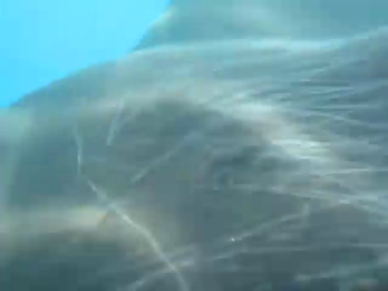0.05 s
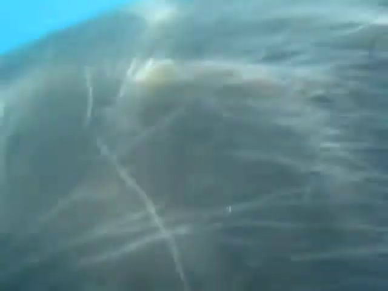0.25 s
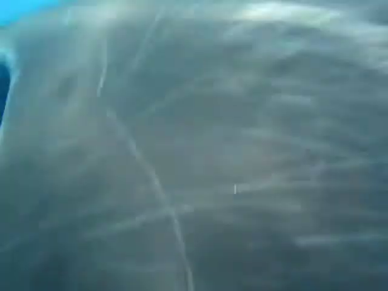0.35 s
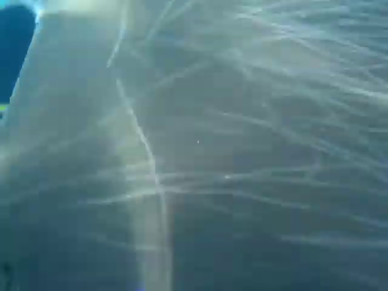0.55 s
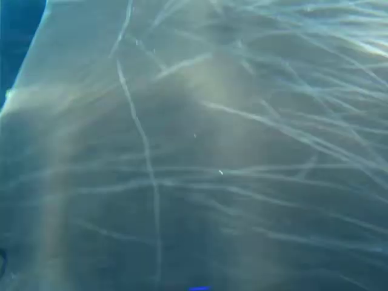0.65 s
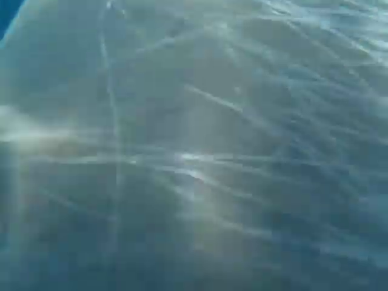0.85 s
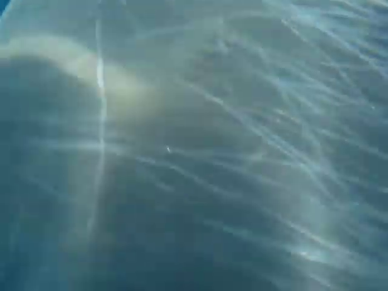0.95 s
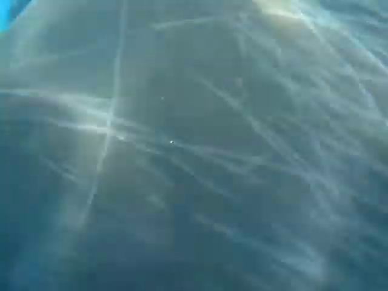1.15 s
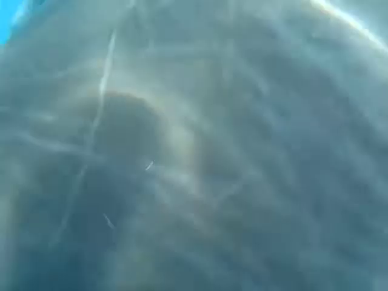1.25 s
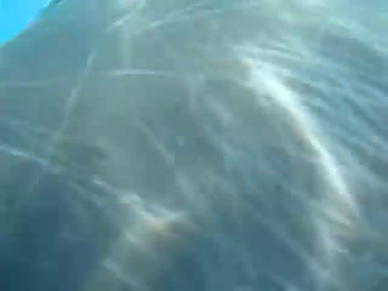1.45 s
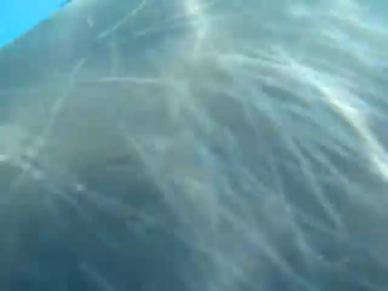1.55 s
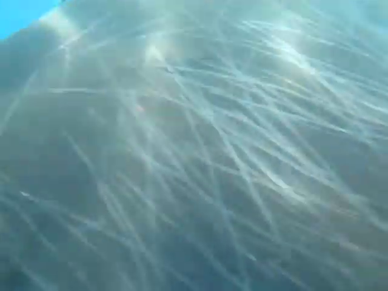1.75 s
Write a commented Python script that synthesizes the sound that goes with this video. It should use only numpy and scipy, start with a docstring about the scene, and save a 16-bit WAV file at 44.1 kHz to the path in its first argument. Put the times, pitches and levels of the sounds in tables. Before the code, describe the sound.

Crackling, snapping and rustling come straight through a plastic case as an animal's fur brushes it, right at the microphone. A short creak dies away and two soft bumps follow, above a quiet rumble and thin electronic whine.

```python
"""A hairy animal presses against a camera's plastic housing, right at the microphone inside.
The contact rubs, sticks and lets go in sharp snaps, with brief scrapes and three squeaks,
then creaks and dies away. One dull knock falls among the snaps and two more near the end.
All of it comes straight through the housing, with no sound of the space around it.
Underneath lie a quiet rumble, a wavering hum, hiss and the thin whine of the electronics."""
import sys
import numpy as np
from scipy import signal
from scipy.fft import rfft, irfft
from scipy.io import wavfile

SR = 44100
rng = np.random.default_rng(int(sys.argv[2]) if len(sys.argv) > 2 else 0)


def put_to_file(sound):
    """Save the sound as 16-bit audio at rate SR, in the file named by the first command-line argument."""
    columns = np.atleast_2d(sound).T  # one column per channel
    safe = np.clip(columns, -1, 1)
    whole_steps = np.round(safe * 32767)
    wavfile.write(sys.argv[1], SR, whole_steps.astype(np.int16))


N = 79380

# spectrum of the rumble and hiss at the microphone (frequency [Hz], relative density [dB])
FLOOR_SPECTRUM = [(25, 1), (70, -3), (170, -5.5), (320, -12.5), (650, -14), (1400, -17), (2100, -23.5),
                  (3000, -22.5), (5500, -18.5), (7300, -22), (9000, -17.5), (10800, -21), (12000, -36),
                  (14000, -26), (16000, -43)]
# the hum underneath (time [s], level [dB])
HUM_LEVELS = [(0, -73), (.12, -65), (.25, -98), (.8, -65.5), (.97, -67.5), (1.37, -65), (1.55, -70),
              (1.8, -105)]
# hair rubbing on the housing (time [s], level [dB])
RUB_LEVELS = [(0, -65.5), (.215, -69), (.25, -44.5), (.282, -59), (.31, -73), (.355, -59), (.38, -51.5),
              (.41, -95), (.46, -52), (.72, -53.5), (.775, -59), (.815, -43), (.84, -42.5), (.854, -40),
              (.862, -59), (.895, -44.5), (.93, -72), (.98, -60.5), (1.012, -48), (1.05, -73), (1.25, -69),
              (1.8, -69.5)]
# resonances of the wall where it is pressed (frequency [Hz], width [Hz], gain before tilt [dB])
WALL_MODES = [(342, 260, -17), (878, 370, -9), (1575, 198, -0.5), (2605, 460, -8), (3000, 160, -9),
              (3600, 380, -11), (4280, 120, -8), (5120, 620, -14), (5890, 320, -11.5), (6910, 320, -20),
              (8180, 820, -23), (9750, 740, -22), (13400, 2300, -43)]
# releases of the contact (time [s], hollow level [dB], shell level [dB], edge level [dB], shell pitch [Hz])
SNAP_EVENTS = [(0.012, -63.5, -51.5, -81, 3950), (0.0629, -55.5, -41, -48.5, 3000),
               (0.0867, -57.5, -45.5, -60, 4100), (0.157, -83, -61, -54, 3700),
               (0.2353, -44, -48, -53, 3530), (0.2425, -36, -48, -44.5, 4600),
               (0.2735, -45, -47, -38, 3200), (0.296, -55.5, -51, -42.5, 4540),
               (0.3635, -60, -48, -50, 3230), (0.3695, -51, -48, -48.5, 4600),
               (0.3885, -52, -50, -59, 4560), (0.4727, -43.5, -35.5, -36, 4860),
               (0.4999, -55, -40.5, -38.5, 5400), (0.514, -46, -35, -41, 3570),
               (0.5168, -41.5, -30, -38.5, 3700), (0.5229, -42, -37, -39, 4000),
               (0.5497, -41, -23.5, -31.5, 3640), (0.5558, -36, -21.5, -36, 3700),
               (0.5608, -49, -44, -45, 3650), (0.5769, -42.5, -31.5, -42, 3870),
               (0.611, -57, -27, -35, 3620), (0.619, -33.5, -23.5, -32.5, 3400),
               (0.6268, -43.5, -32.5, -44, 4050), (0.64, -45, -26, -35.5, 3320),
               (0.6582, -39, -29, -39, 3300), (0.667, -49, -38, -60, 3950),
               (0.6872, -49, -36.5, -45.5, 2750), (0.7082, -41.5, -32, -46, 3680),
               (0.7112, -48, -39.5, -50, 3800), (0.7207, -45, -43, -49, 3570),
               (0.7557, -50.5, -47.5, -53, 3770), (0.7903, -34.5, -40, -50, 3200),
               (0.8041, -32, -47, -42, 3650), (0.819, -40, -41, -34, 3800), (0.8313, -44, -37, -44, 4100),
               (0.834, -34.5, -55, -36, 4740), (0.8387, -60, -40, -35.5, 4150),
               (0.8877, -43.5, -39, -32.5, 5860), (0.8918, -45.5, -48, -46, 3650),
               (0.8976, -60, -52, -48, 5400), (1.0135, -49, -49, -43.5, 4260),
               (1.0256, -41.5, -40, -58, 2810), (1.0315, -47, -42, -60, 2750),
               (1.0423, -45, -45.5, -49, 4670), (1.7761, -78, -70, -52, 3630)]
# the housing's four groups of resonances, low to high (frequency [Hz], width [Hz], relative gain [dB])
HOLLOW_MODES = [(500, 450, -26), (880, 250, -21), (1480, 260, 0), (1950, 380, -11)]
SHELL_MODES = [(2500, 380, -19), (2850, 380, -10), (3380, 420, -3), (3810, 350, 0), (4400, 380, -13)]
RIM_MODES = [(4980, 230, 3), (5360, 960, 4.5), (5800, 200, 0.5)]
EDGE_MODES = [(7145, 850, 8.5), (7440, 900, 9), (8590, 260, 6.5), (9340, 430, 7.5), (10330, 620, 0.5),
              (12550, 2600, -11.5)]
# rumble of the housing shifting in its mount (time [s], level [dB])
SHIFT_LEVELS = [(.2, -70), (.27, -49.5), (.32, -86), (.38, -60.5), (.43, -65.5), (.55, -60), (.76, -65.5),
                (.82, -53), (.9, -65), (.97, -67.5)]
# skids of the contact (time [s], length [s], level [dB])
SCRAPE_EVENTS = [(.2405, 0.0039, -37.5), (0.276, 0.0064, -46), (0.7904, 0.0047, -33), (0.8028, 0.0041, -35),
                 (.8085, 0.0038, -49), (0.8157, 0.0101, -36), (0.8315, 0.00565, -29), (.84, 0.0125, -36.5),
                 (0.869, 0.014, -53), (0.8862, 0.0031, -35.5), (1.027, 0.00223, -41),
                 (1.032, 0.0034, -45.5)]
# broad resonances that a skid rattles (frequency [Hz], width [Hz], relative gain [dB])
RATTLE_MODES = [(950, 700, -7), (3500, 2200, 0), (6000, 2200, -3), (9500, 2200, -2)]
# squeaks of the hollow (time [s], pitch [Hz], length [s], peak level [dB])
SQUEAK_EVENTS = [(0.242, 1476, 0.0062, -24.5), (0.7896, 1595, 0.0095, -27), (.8048, 1620, .0075, -33)]
# blunt bumps (time [s], level [dB], cut-off of the blow [Hz], ring time [share of the modes' t60])
KNOCK_EVENTS = [(0.688, -21, 716, 0.48), (1.617, -28, 9100, 1), (1.7640, -33, 790, 0.79)]
# resonances that a bump rings (frequency [Hz], relative gain [dB], t60 [s])
BUMP_MODES = [(324, -25, 0.072), (447, -12.5, 0.066), (568, -8.5, 0.045), (642, -9.5, 0.034),
              (915, -2, 0.031), (1093, -1, 0.013), (2530, -8.5, 0.015), (3740, -6, 0.014),
              (5200, -7.5, 0.0054), (8550, -0.5, 0.0053)]
# runs of stick-slip on the wall (time [s], length [s], tick rate [Hz], level [dB])
CREAK_RUNS = [(0.912, 0.056, 230, -50), (0.977, 0.043, 200.2, -57), (1.02, 0.036, 191.6, -51.5),
              (1.0602, 0.054, 160.2, -54), (1.1297, 0.0048, 150, -56), (1.147, 0.053, 175.5, -54.5),
              (1.301, 0.0074, 180.5, -58.5), (1.363, 0.0081, 195.5, -56), (1.468, 0.042, 129, -62.5)]


def undb(db):
    """Decibels to gain."""
    return 10 ** (np.asarray(db) / 20)


def unit(x):
    """Scale to rms 1."""
    return x / np.sqrt(np.mean(x ** 2))


def with_energy(x, db, seconds):
    """Scale a burst to the energy of a level db held for this many seconds."""
    return x * undb(db) * np.sqrt(seconds * SR / np.sum(x ** 2))


def envelope(rows):
    """Gain over time from (time [s], level [dB]) points joined by straight lines."""
    times, db = np.array(rows).T
    return undb(np.interp(np.arange(N) / SR, times, db))


def add(out, start, x):
    """Mix a short sound in at start seconds."""
    i = max(int(start * SR), 0)
    out[i:i + len(x)] += x[:max(N - i, 0)]


def resonate(x, hz, width_hz):
    """Steep resonance: two band-passes in a row, gain 1 at the centre."""
    b, a = signal.iirpeak(min(hz, .45 * SR), hz / (width_hz * np.pi / 2), fs=SR)
    return signal.lfilter(b, a, signal.lfilter(b, a, x))


def ring(force, modes):
    """A force rings one group of the housing's resonances; neighbours swing in opposite senses."""
    return sum((-1) ** k * undb(db) * resonate(force, hz, width)
               for k, (hz, width, db) in enumerate(modes))


def wall(force, db_per_octave):
    """A rubbing force rings the wall, tilted towards the treble: faster rubbing is brighter."""
    lowest_hz = WALL_MODES[0][0]
    tilted = [(hz, width, db + db_per_octave * np.log2(hz / lowest_hz)) for hz, width, db in WALL_MODES]
    return ring(force, tilted)


def background():
    """The bed under the animal: low rumble and hiss, a wavering hum and a steady electronic whine."""
    floor_db, whine_hz, whine_db = -61.5, 5880, -64
    hz, db = np.array(FLOOR_SPECTRUM).T
    freqs = np.maximum(np.arange(N // 2 + 1) * SR / N, 1)
    spectrum = undb(np.interp(np.log(freqs), np.log(hz), db))
    floor = unit(irfft(rfft(rng.standard_normal(N)) * spectrum, N))
    hum = unit(resonate(rng.standard_normal(N), hz=434.2, width_hz=27))
    whine = unit(np.sin(2 * np.pi * whine_hz * np.arange(N) / SR))
    return undb(floor_db) * floor + envelope(HUM_LEVELS) * hum + undb(whine_db) * whine


def rub():
    """Hairs catch on the plastic in dense little grains, right by the microphone."""
    grains_per_s, spread_db = 3500, 3
    catches = (rng.random(N) < grains_per_s / SR) * rng.choice([-1, 1], N)
    strength = undb(spread_db * np.minimum(rng.exponential(size=N), np.pi))
    return unit(wall(catches * strength, db_per_octave=2.5)) * envelope(RUB_LEVELS)


def snaps():
    """Each release is a sharp pulse with a crack and chatter; the slide after it rings the bright edge."""
    crack_s, crack_db, chatter_s, chatter_db = .0007, -20, .0035, -29
    slide_s, slide_db = .00032, -20
    shell_hz, damping_per_octave = 3650, 4.5
    out, t = np.zeros(N), np.arange(SR // 25) / SR
    trail = undb(crack_db) * np.exp(-t / crack_s) + undb(chatter_db) * np.exp(-t / chatter_s)
    for start, hollow_db, shell_db, edge_db, spot_hz in SNAP_EVENTS:
        crack, grit = rng.standard_normal((2, len(t)))
        force = (t == 0) + trail * crack
        slide = force + undb(slide_db) * np.exp(-t / slide_s) * grit
        rim_db = (shell_db + edge_db) / 2 - 2.5
        # spots that sound above or below the shell's own pitch are more damped
        damping = 1 + damping_per_octave * abs(np.log2(spot_hz / shell_hz))
        spot_modes = [(hz * spot_hz / shell_hz, width * damping, db) for hz, width, db in SHELL_MODES]
        for push, db, modes in ((force, hollow_db, HOLLOW_MODES), (force, shell_db, spot_modes),
                                (force, rim_db, RIM_MODES), (slide, edge_db, EDGE_MODES)):
            add(out, start, with_energy(ring(push, modes), db, seconds=.0034))
    return out


def shift():
    """The firmer pushes move the whole housing around the microphone with a faint low rumble."""
    return unit(resonate(rng.standard_normal(N), hz=230, width_hz=344)) * envelope(SHIFT_LEVELS)


def scrapes():
    """The contact breaks loose and skids for a few milliseconds, rattling the whole housing."""
    out, span = np.zeros(N), SR // 25
    for start, length, db in SCRAPE_EVENTS:
        n = int(length * SR)
        contact = np.pad(signal.windows.tukey(n, alpha=.23), (0, span - n))
        rattle = ring(contact * rng.laplace(size=span), RATTLE_MODES)
        add(out, start, with_energy(rattle, db, seconds=n / SR))
    return out


def squeaks():
    """For a few milliseconds the slip locks to the hollow's pitch, sagging a little."""
    sag_hz_per_s, skew = 9100, .99  # a skew under 1 swells faster than it fades
    out = np.zeros(N)
    for start, hz, length, db in SQUEAK_EVENTS:
        t = np.arange(int(length * SR)) / SR
        pitch = hz - sag_hz_per_s * (t - length / 2)
        swell = np.sin(np.pi * (t / length) ** skew)
        add(out, start, undb(db) * swell * np.sin(2 * np.pi * np.cumsum(pitch) / SR))
    return out


def knocks():
    """Blunt bumps ring modes that swell over a cycle or so; softer bumps reach fewer and damp them."""
    rise_cycles = .87
    out, t = np.zeros(N), np.arange(SR // 8) / SR
    for start, db, cutoff_hz, ring_share in KNOCK_EVENTS:
        for hz, mode_db, t60 in BUMP_MODES:
            gain = undb(db + mode_db) / (1 + (hz / cutoff_hz) ** 4)
            rise = 1 - np.exp(-t * hz / rise_cycles)
            decay = undb(-60 * t / (t60 * ring_share))
            add(out, start, gain * rise * decay * np.sin(2 * np.pi * hz * t))
    return out


def creaks():
    """Short runs of nearly regular stick-slip: each tick is one gritty slip of about the same strength."""
    slip_s, slip_db, jitter, scatter_db = .0026, -13, .07, 1
    out, t = np.zeros(N), np.arange(SR // 50) / SR
    slip = undb(slip_db) * np.clip(1 - t / slip_s, 0, 1) ** .5
    for start, length, rate, db in CREAK_RUNS:
        elapsed = 0
        for stretch, size, *grit in rng.standard_normal((20, len(t) + 2)):  # up to 20 ticks a run
            if elapsed < length:
                tick = wall((t == 0) + slip * grit, db_per_octave=1.8)
                add(out, start + elapsed, with_energy(tick, db + scatter_db * size, seconds=1 / rate))
                elapsed += np.exp(jitter * stretch) / rate
    return out


def scene():
    """One microphone at contact distance: the animal's sounds reach it straight through the housing."""
    return (snaps() + squeaks() + scrapes() + rub() + creaks() + knocks() + shift() + background())[None]


def record(dry):
    """The sound has a narrow notch near 12 kHz and is cut off above 16 kHz."""
    notch_hz, top_hz = 11860, 16000
    notched = signal.lfilter(*signal.iirnotch(notch_hz, Q=10.2, fs=SR), dry)
    return signal.sosfilt(signal.ellip(8, .2, 70, top_hz, fs=SR, output="sos"), notched)


dry = scene()
out = record(dry)
put_to_file(out)
```